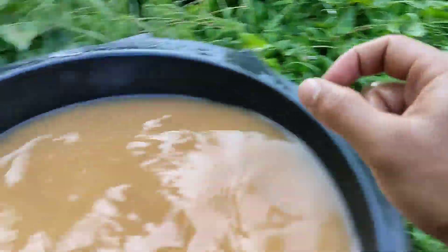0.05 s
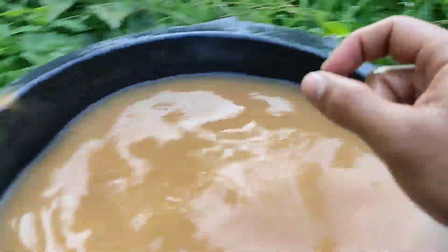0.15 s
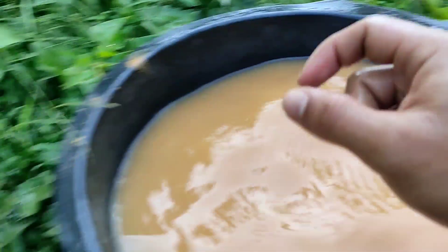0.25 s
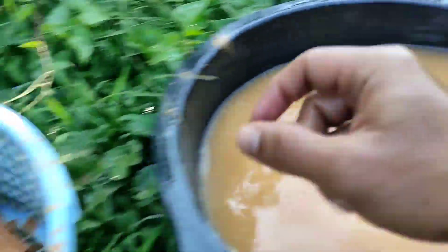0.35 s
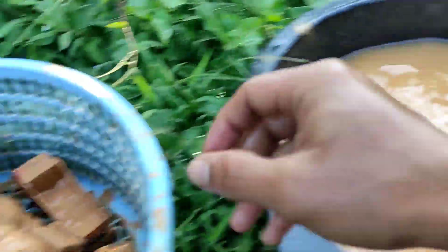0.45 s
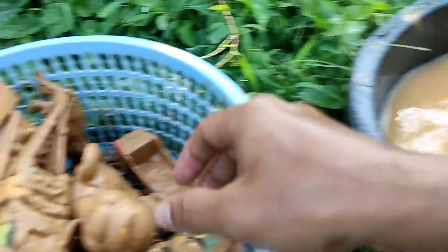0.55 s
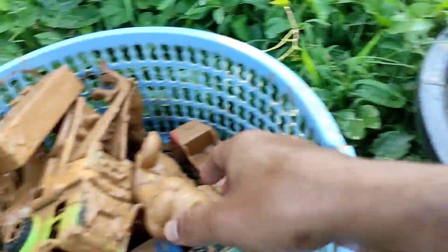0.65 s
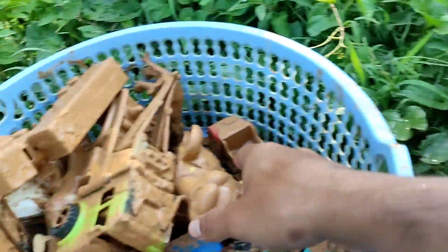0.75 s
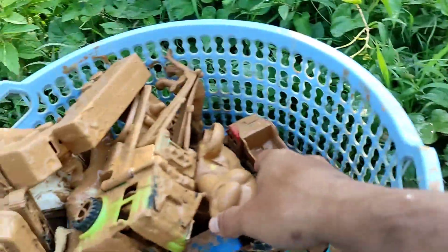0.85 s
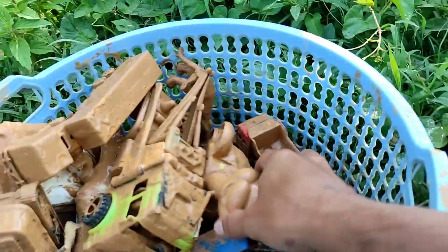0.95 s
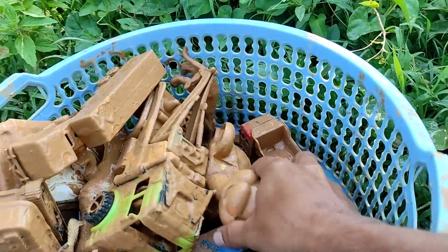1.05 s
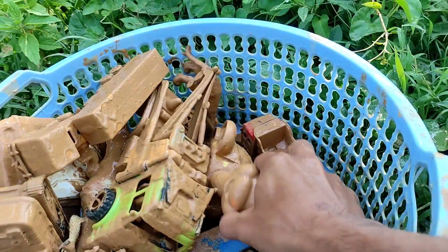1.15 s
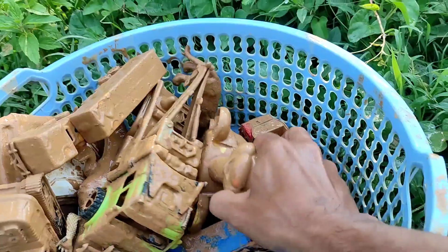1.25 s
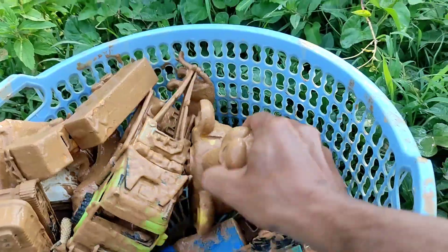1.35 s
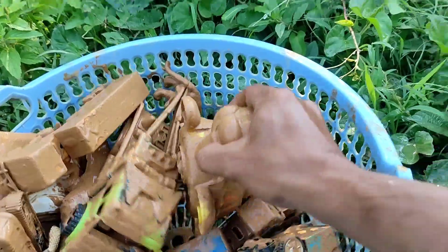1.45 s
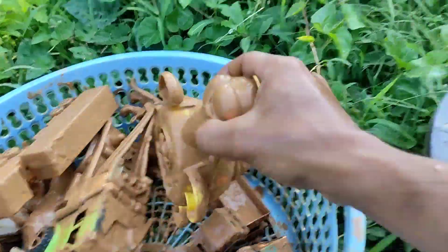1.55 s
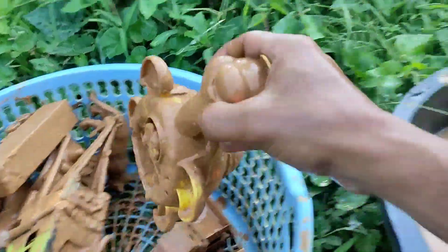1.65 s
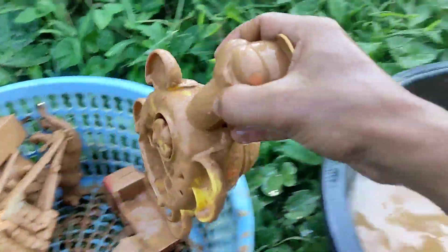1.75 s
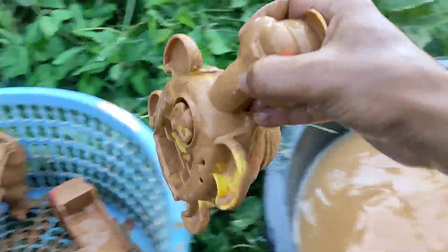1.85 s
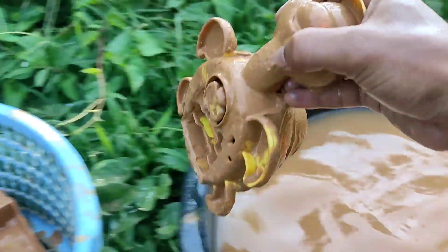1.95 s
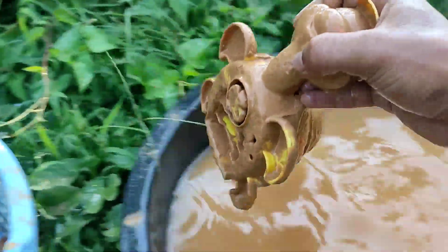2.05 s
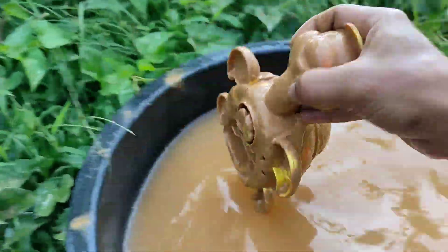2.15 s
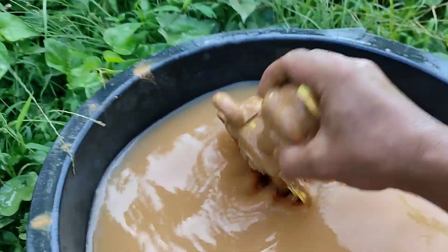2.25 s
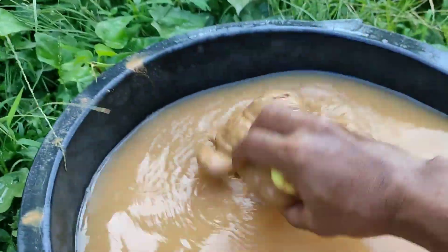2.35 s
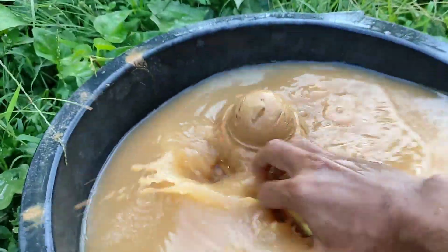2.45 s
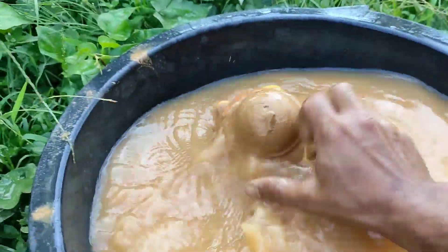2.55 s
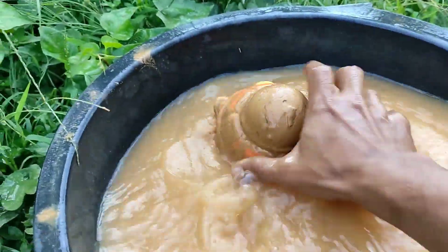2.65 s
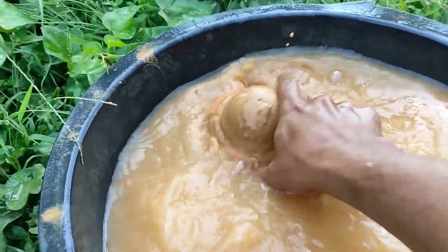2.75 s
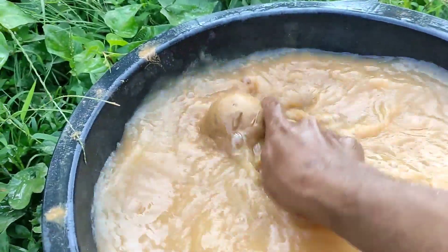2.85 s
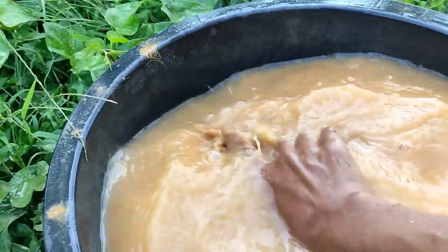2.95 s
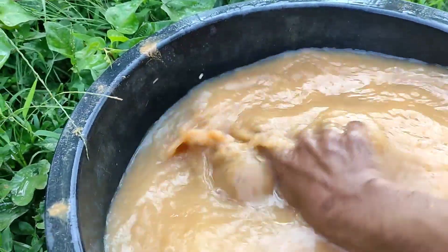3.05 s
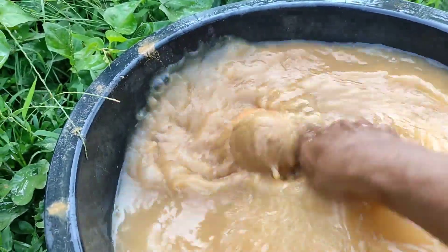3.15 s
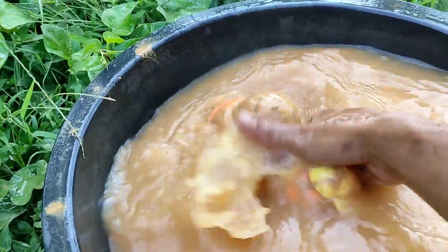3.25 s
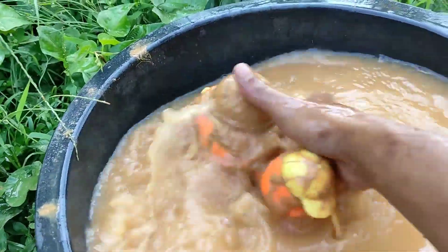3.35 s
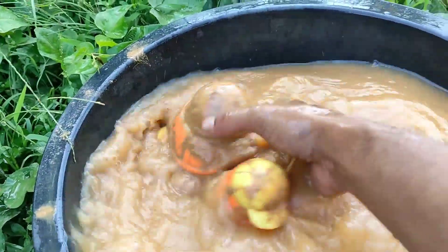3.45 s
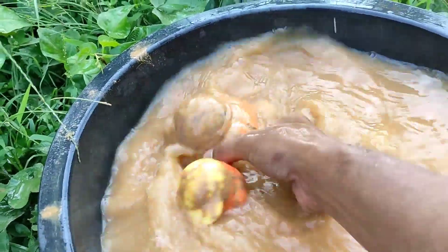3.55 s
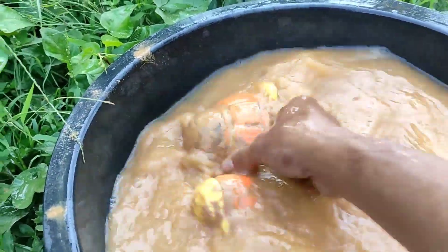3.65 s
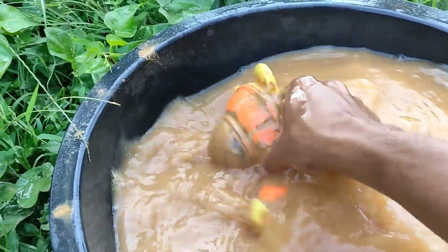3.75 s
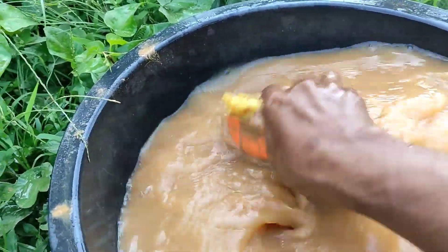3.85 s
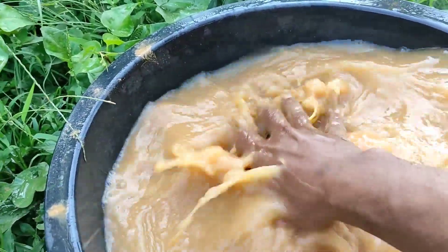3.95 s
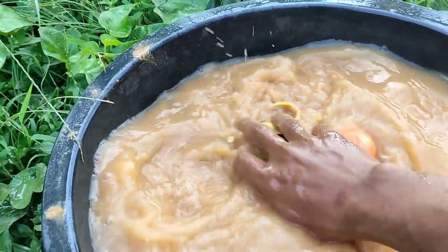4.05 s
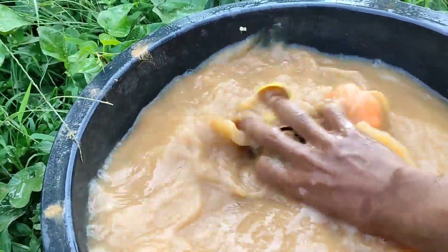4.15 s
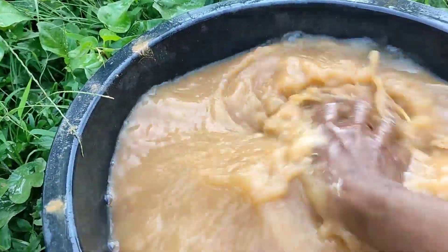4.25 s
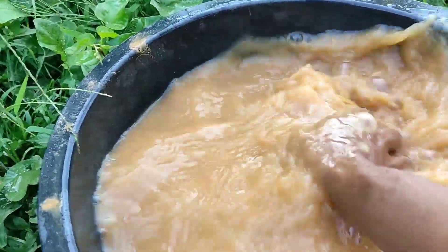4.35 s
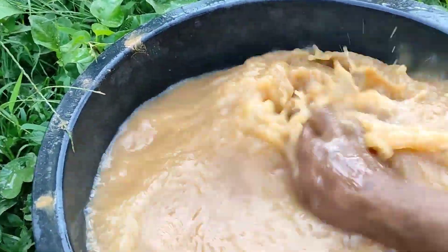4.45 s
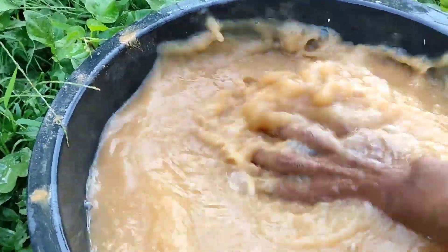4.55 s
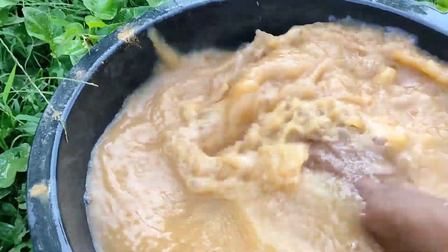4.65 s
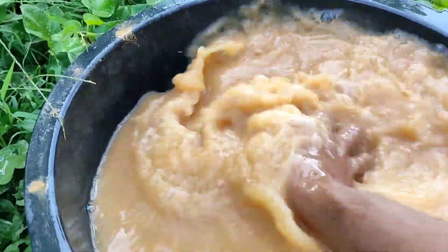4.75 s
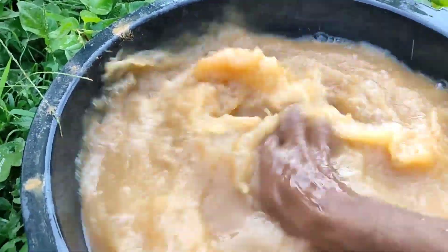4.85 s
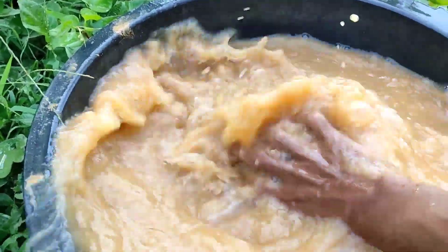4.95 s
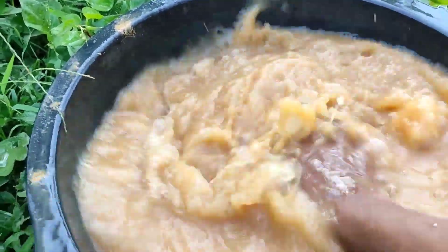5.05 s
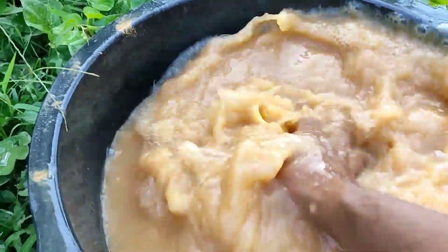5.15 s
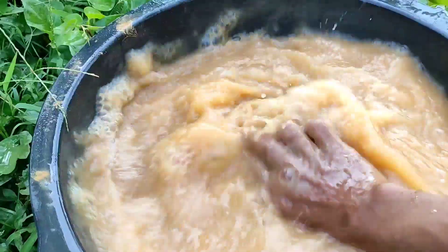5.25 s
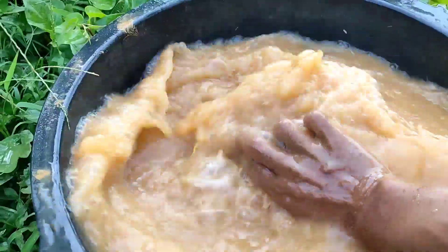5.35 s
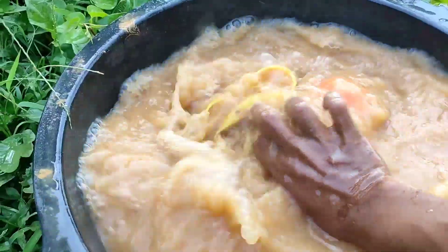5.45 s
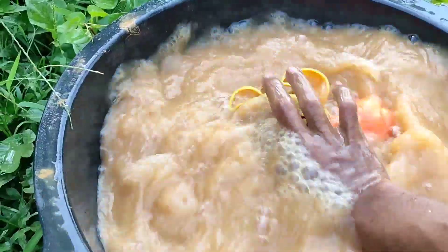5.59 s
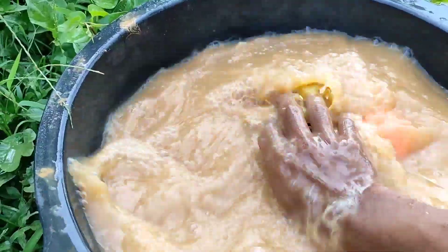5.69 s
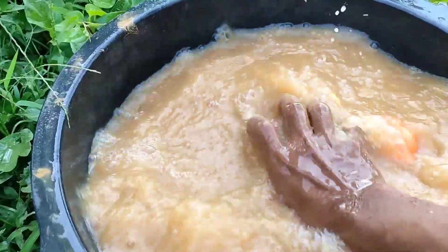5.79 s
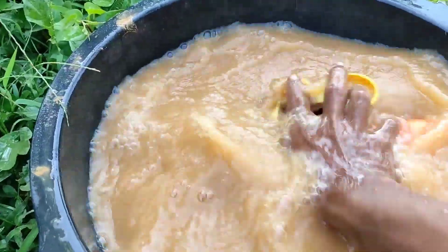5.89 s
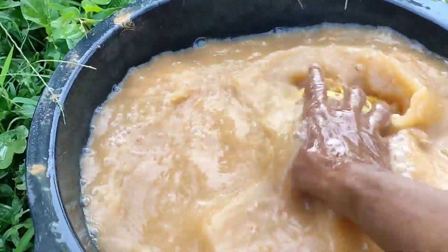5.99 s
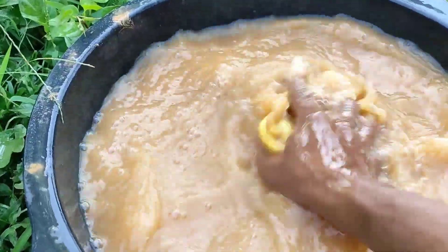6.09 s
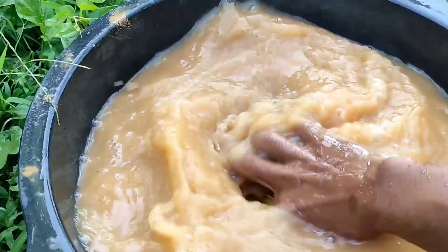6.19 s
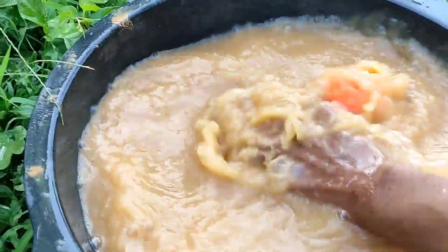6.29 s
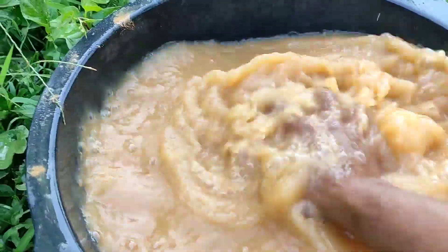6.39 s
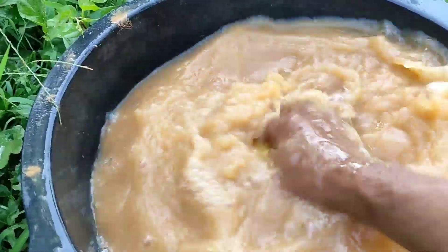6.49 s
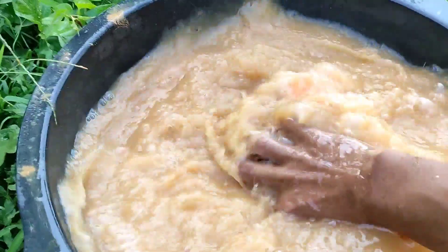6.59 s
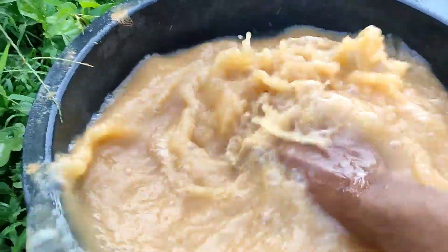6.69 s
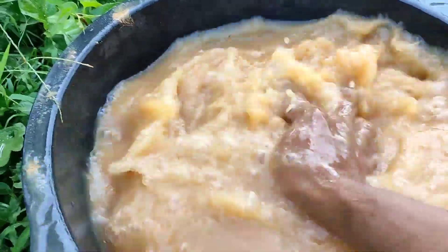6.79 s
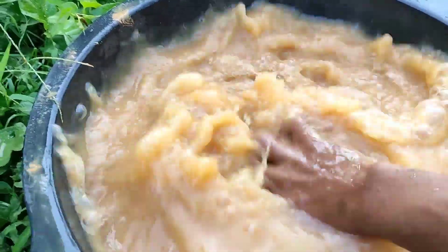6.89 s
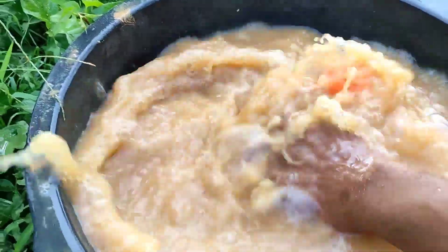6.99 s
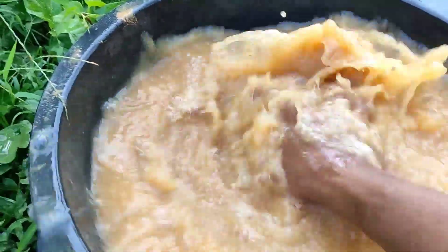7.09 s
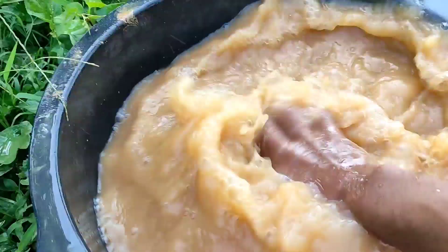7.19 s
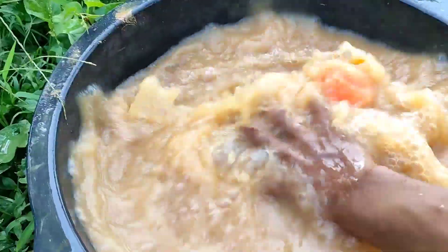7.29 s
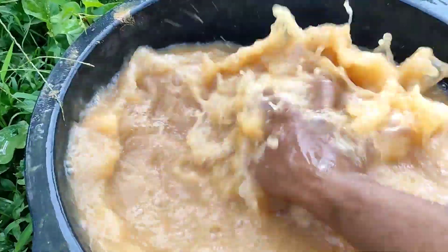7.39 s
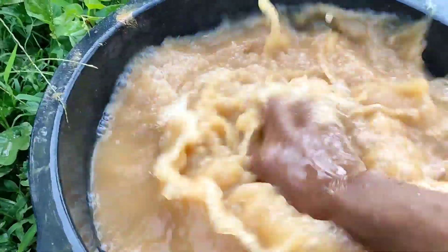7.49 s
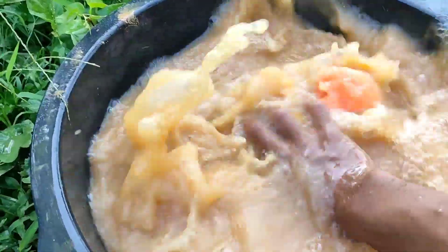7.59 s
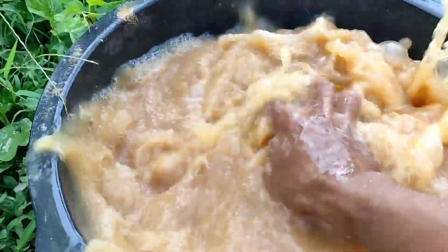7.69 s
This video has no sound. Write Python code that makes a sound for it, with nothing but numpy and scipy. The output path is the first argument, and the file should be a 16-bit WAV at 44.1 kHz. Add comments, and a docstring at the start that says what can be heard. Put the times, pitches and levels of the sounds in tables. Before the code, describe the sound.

Close and dry in the open air: a small drip, near quiet, then a short scuffing drag of wet hollow plastic. A loud plunge into a water tub follows, with scattered bloops and spattering drops. The scrubbing starts gently, pauses slightly, then grows into rapid swishes, gurgles, throaty glugs and fizzing spray that are loudest at the end. Faint insects and distant low rumble lie beneath.

```python
"""Air pockets trapped in a plastic tub of muddy water ring as gliding, decaying sines while a hand scrubs a toy.
First the hand leaves the tub and drags the toy out of a basket of toys: noise slips excite hollow resonances.
Thrown drops splat as short noise bursts; the churned water gurgles and fizzes as swarms of small bubbles
on rushing noise. Outdoors, far rumble, leaf hiss and insects are shaped noise. Two close microphone ports hear it."""
import sys
import numpy as np
from scipy import signal
from scipy.fft import rfft, irfft, next_fast_len
from scipy.io import wavfile
from scipy.ndimage import uniform_filter1d, map_coordinates

SR = 44100
rng = np.random.default_rng(int(sys.argv[2]) if len(sys.argv) > 2 else 0)


def int16_out(signal):
    """Quantize to a 16-bit WAV file."""
    q = np.round(np.clip(np.atleast_2d(signal).T, -1, 1) * 32767)
    wavfile.write(sys.argv[1], SR, q.astype(np.int16))


def field_ratio(decibels):
    """Amplitude ratio for a level in dB (20 dB per decade); scalars and array-likes work."""
    return 10 ** (np.asarray(decibels, dtype=float) / 20)


N = 340893  # samples


def unit(x):
    """Normalization: a signal scaled to rms 1."""
    return x / np.sqrt(np.mean(x ** 2) + 1e-20)


def along(points, hz):
    """Spectral interpolation: (Hz, value) points joined on a logarithmic frequency axis."""
    f, v = np.transpose(points)
    return np.interp(np.log(hz + 1), np.log(f + 1), v)


def curve(rows):
    """Level contour: dB per sample along (s, dB) rows, silent outside them."""
    s, db = np.transpose(rows)
    return np.interp(np.arange(N) / SR, s, db, -200, -200)


def wobble(rate):
    """Band-limited fluctuation: a smooth random curve with rate knots a second."""
    coarse = np.arange(0, N + 16, 16)
    knots = rng.standard_normal(int(N * rate / SR) + 4)
    return np.interp(np.arange(N), coarse, map_coordinates(knots, [coarse * rate / SR]))


def filtered(x, response):
    """Linear filtering: the spectrum times a complex response of frequency."""
    m = next_fast_len(N + 8192)
    return irfft(rfft(x, m) * response(np.fft.rfftfreq(m, 1 / SR)), m)[..., :N]


def resonant(modes):
    """Modal superposition: causal response of (Hz, width Hz, dB) resonances with alternating sign."""
    def response(f):
        total = 0
        for k, (centre, width, db) in enumerate(modes):
            damping = 1j * f * width
            total = total + (-1) ** k * field_ratio(db) * damping / (centre * centre - f * f + damping)
        return total
    return response


def hiss(response, alike):
    """Partial coherence: stereo noise of rms 1 with a colour and a left-right likeness per frequency."""
    m = next_fast_len(N)
    hz = np.fft.rfftfreq(m, 1 / SR)
    turn = np.arccos(np.clip(along(alike, hz), -1, 1)) / 2
    a, b = rng.standard_normal((2, 2, len(hz)))
    mid, side = irfft((a + 1j * b) * response(hz) * [np.cos(turn), np.sin(turn)], m)[:, :N]
    return unit(np.array([mid + side, mid - side]))


def patchy(x, depth_db):
    """Time-frequency modulation: random gain patches about a kilohertz wide and some 15 ms long, rms 1."""
    z = signal.stft(x, nperseg=256)[2]
    across_hz = uniform_filter1d(rng.standard_normal(z.shape[1:]), size=8, axis=0)
    field = uniform_filter1d(across_hz, size=4, axis=1)
    return unit(signal.istft(z * field_ratio(depth_db * unit(field)), nperseg=256)[1][:, :N])


def crests(s, db, fall, rise):
    """Energy summation: power of swells that climb to db at s and sink 10 dB per fall time."""
    t = np.arange(0, N, 64)[:, None] / SR - s
    power = np.sum(field_ratio(db - 10 * np.abs(t) / np.where(t < 0, rise * fall, fall)) ** 2, axis=1)
    return np.interp(np.arange(N), np.arange(0, N, 64), power)


def bubbles(s, db, hz, glide, swell, decay, lag, pan_db, size):
    """Damped oscillators: gliding sines swell to a peak at s, then lose 10 dB per decay time."""
    step = np.arange(size) - size // 3
    t = step / SR
    bend = np.clip(glide * t, -1, 0.33)  # octaves from the pitch at the peak
    phase = 2 * np.pi * np.cumsum(hz * 2 ** bend, axis=1) / SR
    envelope = np.where(t < 0, np.clip(1 + t / swell, 0, 1), field_ratio(-10 * np.abs(t) / decay))
    wave = envelope * np.sin(phase)
    out = []
    for side in (1, -1):  # the left port hears each bubble lag seconds late
        at = np.clip(np.round((s + side * lag[:, None] / 2) * SR).astype(int) + step, 0, N)
        panned = field_ratio(db + side * pan_db / 2) * wave
        out.append(np.bincount(at.ravel(), panned.ravel(), N + 1)[:N])
    return np.array(out)


def swarm(count, hz, octaves, cycles, scatter_db, lag_ms, size):
    """Stochastic superposition: small bubbles all through, of log-normal pitch and uneven level, rms 1."""
    when = rng.random((count, 2))
    z = rng.standard_normal((count, 5))
    pitch = np.clip(hz * 2 ** (octaves * z[:, :1]), 290, 15500)
    life = cycles * 2 ** (.5 * z[:, 1:2]) / pitch
    db = np.minimum(-scatter_db * np.log(when[:, 1:]), 9)  # a few loud among many soft
    glide = (0.31 + 0.19 * z[:, 2:3]) / life / 2  # a bubble rising to the surface sharpens
    lag, pan_db = lag_ms / 1000 * z[:, 3], 1.6 * z[:, 4:]
    return unit(bubbles(when[:, :1] * N / SR, db, pitch, glide, 0.38 * life, life, lag, pan_db, size))


# Spectrum of far rumble and leaf hiss. Each row: frequency in Hz, relative spectral level in dB.
AIR_COLOUR = [(15, -65), (25, -22), (120, -3), (326, -17), (560, -21), (624, -22), (754, -22), (2000, -30),
              (3820, -32), (7310, -37.5), (10700, -32), (16000, -45)]
# Coherence of the open air. Each row: frequency in Hz, left-right likeness (1 is alike).
AIR_LIKENESS = [(60, 0.91), (130, 0.95), (290, 0.52), (640, 0), (1400, 0)]
# Insect bands. Each row: centre in Hz, width in Hz, level in dB, pulses per second, left-right difference in dB.
INSECT_BANDS = [(9620, 1000, -63.5, 110, 11.5), (11770, 800, -66, 120, -12)]


def garden():
    """Amplitude-modulated noise: insects pulse in narrow treble bands over far rumble and leaf hiss."""
    air = hiss(lambda hz: field_ratio(along(AIR_COLOUR, hz)) * (1 + 40 / (hz + 20)), AIR_LIKENESS)
    out = field_ratio(-42.5 + 0.52 * wobble(4.5)) * air
    growth = np.clip(np.arange(N) / SR - 1.6, 0, 1)  # the low rumble grows over the tub
    rumble = hiss(lambda f: resonant([(110, 110, 0)])(f) ** 2, AIR_LIKENESS)
    out += field_ratio(-48.5 + 5.1 * wobble(5)) * growth * rumble
    for hz, width, db, rate, pan_db in INSECT_BANDS:
        pulses = 1 + .7 * np.sin(2 * np.pi * np.cumsum(rate * (1 + 0.018 * wobble(5.1))) / SR)
        band = hiss(lambda f: resonant([(hz, width, 0)])(f) ** 2, AIR_LIKENESS)
        out += field_ratio(db + 1.7 * wobble(3.1) + np.array([[pan_db], [-pan_db]]) / 2) * pulses * band
    return out


# Coherence of the near sounds. Each row: frequency in Hz, left-right likeness (1 is alike).
WATER_LIKENESS = [(290, 1), (640, 0.84), (1400, 0.43), (3100, 0.49), (6000, 0.021)]
# Colour of the spray at the ports. Each row: frequency in Hz, relative spectral level in dB.
PORT_COLOUR = [(1760, 6), (3000, 5), (4630, -4.5), (6620, -9), (7150, -15), (8880, 0), (12000, -6.5),
               (14900, -10.5), (16000, -33)]
# Effort of the drag from the pile. Each row: time in seconds, scrape level in dB.
SCRAPE_LEVEL = [(1.25, -74), (1.285, -39), (1.351, -43), (1.44, -35), (1.46, -30), (1.47, -20.5),
                (1.485, -30), (1.525, -27.5), (1.578, -32.5), (1.672, -41), (1.706, -80)]
# Modes of the hollow plastic toy. Each row: frequency in Hz, width in Hz, gain in dB.
TOY_MODES = [(330, 180, -6), (1120, 720, 1), (2000, 1060, -0.5), (4500, 5600, -15.5)]
# The pitch of the gap under the toy dips, rises, then sinks as it lifts. Each row: time in seconds, pitch in Hz.
GAP_PITCH = [(1.3, 1900), (1.39, 1500), (1.47, 2000), (1.525, 1097), (1.701, 950)]
# The pile settles. Each row: time of crest in seconds, level in dB, seconds to lose 10 dB.
PILE_SHIFTS = [(.52, -47, .03), (.82, -47, .05), (1.391, -39, 0.04), (1.56, -33, 0.06)]


def drag():
    """Stick-slip excitation: uneven slips of wet plastic drive hollow bodies and a gap of moving pitch."""
    scrape_db = curve(SCRAPE_LEVEL)
    rattle = field_ratio(-42 + 0.28 * (scrape_db + 35))  # -42 dB when the scrape is at -35 dB
    settling = crests(*np.transpose(PILE_SHIFTS), rise=0.79)
    knock = np.sqrt(rattle ** 2 * (scrape_db > -199) + settling)
    slips = field_ratio(2.0 * wobble(200) + 1.06 * wobble(40.16))
    body = hiss(lambda hz: resonant(TOY_MODES)(hz) / (1 + (600 / (hz + 1)) ** 4), WATER_LIKENESS)
    turn = 2 * np.pi * np.cumsum(np.interp(np.arange(N) / SR, *np.transpose(GAP_PITCH))) / SR
    gap = unit(wobble(500) * np.cos(turn) + wobble(500) * np.sin(turn))
    film = hiss(lambda hz: field_ratio(along(PORT_COLOUR, hz)) / (1 + (3000 / (hz + 1)) ** 4), WATER_LIKENESS)
    rubbing = patchy(slips * (body + 0.66 * gap + 0.5 * film), depth_db=3.0)
    pile = hiss(resonant([(260, 93, 0.9), (430, 224, -2.3)]), WATER_LIKENESS)
    knocking = unit(field_ratio(4.6 * wobble(50.02)) * pile)
    return (field_ratio(scrape_db) * rubbing + knock * knocking) * field_ratio([[1.5], [-1.5]])  # left-right dB


# How hard the hand works the water. Each row: time in seconds, gurgle drive in dB.
HAND_EFFORT = [(1.95, -66), (2.2, -53), (2.39, -60), (2.62, -46), (3.0, -52), (3.17, -49), (3.3, -38),
               (3.68, -53), (3.85, -43.5), (4.25, -40.5), (4.5, -31.5), (4.9, -37), (5.25, -30.5),
               (5.72, -37.5), (6.03, -49.5), (6.3, -29), (6.9, -26.5), (7.2, -23.5), (7.74, -22)]
# Waves thrown up by the hand. Each row: time of crest in seconds, gurgle drive in dB,
# spray over gurgle in dB, seconds to lose 10 dB.
HAND_WAVES = [(.004, -38, -15, .04), (.06, -46, 4, .03), (.092, -35, -1, 0.018), (.148, -42, -10, .02),
              (2.421, -22, -10, 0.0178), (2.467, -22, -10, .04), (2.52, -29, -6, .025),
              (2.58, -27, -7, .035), (2.735, -46, 9, .07), (2.76, -26, -12, .04), (2.875, -32.5, -20, 0.02),
              (2.93, -27, -3, .05), (3.029, -27.5, -9, 0.043), (3.107, -29, -4, .025), (3.21, -45, 4, 0.05),
              (3.375, -44, 11, .05), (3.432, -41, -12, 0.1), (3.5, -46, 6, .05), (3.55, -44, 6, .05),
              (3.737, -30, -9.5, .02), (3.63, -44, 8, 0.05), (3.985, -42, 9, .05), (4.051, -22, -8, .04),
              (4.126, -21.5, -4, 0.0435), (4.332, -28, -1, 0.0351), (4.464, -26.5, -16, 0.08),
              (4.54, -30, 3.5, 0.13), (4.679, -19.5, -9.5, 0.0737), (4.79, -25.5, -5, 0.0864),
              (4.96, -21, -6, .07), (5.08, -20.5, -4, .12), (5.27, -26, -6, .04), (5.335, -20.5, -4, .08),
              (5.443, -14.5, -25, 0.01), (5.553, -29.5, -4, 0.11), (5.773, -28.5, -2.5, 0),
              (5.945, -37, 1.5, 0.1), (6.088, -39.5, 2.5, 0.1), (6.254, -29.5, -2, 0.09),
              (6.363, -20, -6, 0.0557), (6.46, -27, -4, .06), (6.56, -30, -14, .04), (6.62, -31.5, 3, .11),
              (6.745, -24.5, -9, .09), (6.82, -28.5, 4, 0.12), (6.9, -23, -7, .08),
              (6.99, -18.5, -7, 0.125), (7.307, -24.5, -5.5, 0.09), (7.436, -23.5, -2, 0.13),
              (7.59, -27, 2, .1)]


def stirring():
    """Energy addition: the drives of gurgle and spray sum the steady effort and the single waves."""
    effort_db = curve(HAND_EFFORT)
    s, db, spray_db, fall = np.transpose(HAND_WAVES)
    rise = .6  # a wave builds in this share of the time it takes to fall
    steady_spray_db = -35.5 + 1.08 * (effort_db + 30)  # -35.5 dB when the effort is at -30 dB
    gurgle = field_ratio(effort_db) ** 2 + crests(s, db, fall, rise)
    spray = field_ratio(steady_spray_db) ** 2 + crests(s, db + spray_db, fall, rise)
    return np.sqrt([gurgle, spray])


# Modes of the air over the water. Each row: frequency in Hz, width in Hz, gain in dB.
TUB_MODES = [(430, 300, 4.5), (870, 122, 5.5), (1350, 317, 4.5)]


def churn():
    """Bubble-cloud radiation: clouds of several sizes and droplet ticks on rushing noise, with wall thuds."""
    gurgle, spray = stirring()
    lump = wobble(70)  # shared unevenness of all three bands
    rush = hiss(resonant(TUB_MODES), WATER_LIKENESS)

    low = swarm(count=1900, hz=680, octaves=0.52, cycles=2.9, scatter_db=4.5, lag_ms=0.098, size=700)
    low = low + 0.4 * rush
    mid = swarm(count=2200, hz=1500, octaves=0.36, cycles=4.6, scatter_db=6.0, lag_ms=0.14, size=500)
    mid = mid + 0.3 * rush
    mid = filtered(mid, lambda hz: .5 + .5 / (1 + (hz / 1850) ** 16))  # steps down above 1850 Hz

    fine = swarm(count=6000, hz=6980, octaves=0.71, cycles=3.6, scatter_db=5, lag_ms=.15, size=90)
    drops = filtered(fine, lambda hz: field_ratio(0.37 * along(PORT_COLOUR, np.maximum(hz, 3500))))
    plinks = swarm(count=1200, hz=2990, octaves=0.498, cycles=7.2, scatter_db=6.5, lag_ms=0.11, size=330)
    fizz = hiss(lambda hz: field_ratio(along(PORT_COLOUR, hz)) / (1 + (2200 / (hz + 1)) ** 2), WATER_LIKENESS)
    fizz = patchy(fizz, depth_db=4.5) * field_ratio(2.3 * wobble(200))
    high = 0.85 * unit(drops) + .68 * plinks + fizz
    thud = hiss(lambda hz: resonant([(140, 160, 0)])(hz) ** 2, WATER_LIKENESS)

    low = unit(low * field_ratio(2.1 * lump + 4 * wobble(30)))
    mid = unit(mid * field_ratio(1.94 * lump + 1.3 * wobble(45)))
    high = unit(high * field_ratio(1.77 * lump + 1.6 * wobble(90)))
    thud = unit(thud * field_ratio(3.6 * wobble(20)))  # waves against the tub wall
    out = gurgle * low * field_ratio(-3.6)
    out += np.sqrt(gurgle * spray) * mid * field_ratio(-1.5)
    out += spray * high * field_ratio(-0.5)
    out += gurgle * thud * field_ratio(-24.5)
    return out


# Thrown water landing. Each row: time in seconds, level in dB before a common 5 dB cut, centre in Hz.
LANDINGS = [(0.0737, -15.5, 4000), (0.0932, -32, 8830), (0.138, -31, 2000), (0.84, -36, 2500),
            (2.3266, -14.5, 3900), (2.422, -16, 2900), (2.453, -12.5, 3980), (2.473, -8, 4600),
            (2.4765, -12, 12000), (2.508, -4.5, 9110), (2.599, -11, 3500), (2.6084, -14, 9020),
            (2.6788, -15, 3600), (2.7232, -25, 9220), (2.8574, -27, 9440), (2.926, -15, 9420),
            (2.9324, -16.5, 3960), (2.9648, -16.5, 3600), (3.019, -21, 4740), (3.0265, -19, 10100),
            (3.0979, -23, 3780), (3.1222, -19.5, 3200), (3.1918, -21, 8200), (3.2077, -12, 9990),
            (3.2164, -19, 4540), (3.3508, -24, 3050), (3.3812, -19, 3500), (3.3994, -16.5, 3520),
            (3.457, -24, 8850), (3.4855, -25, 9920), (3.538, -14, 9190), (3.6037, -25, 5600),
            (3.6306, -19.5, 3000), (3.6394, -15.5, 8870), (3.676, -25, 11000), (3.691, -23, 9000),
            (3.7249, -24, 8520), (3.9679, -10, 3610), (3.9958, -12, 8850), (4.026, -10, 3600),
            (4.0601, -10, 8340), (4.0838, -15, 8790), (4.1177, -10, 3870), (4.1374, -15.5, 9060),
            (4.1957, -22, 4730), (4.3969, -15.5, 6700), (4.5974, -17, 3660), (4.7125, -19, 5200),
            (4.7661, -20, 4180), (4.9473, -19, 3740), (5.005, -10, 8840), (5.173, -15.5, 8810),
            (5.252, -18, 4860), (5.3357, -10.5, 4660), (5.344, -12, 9330), (5.4085, -19, 6720),
            (5.5408, -15, 9540), (5.5585, -21, 5560), (5.656, -10.5, 4530), (5.7613, -17.5, 5400),
            (5.8194, -9, 11800), (5.9454, -23, 3950), (6.084, -14, 8740), (6.1789, -15, 9800),
            (6.2834, -21, 4780), (6.363, -11, 4520), (6.389, -12, 4810), (6.643, -18, 9600),
            (6.8225, -14, 8230), (6.993, -9.5, 9150), (7.0995, -18, 10500), (7.2646, -9.5, 11800),
            (7.4145, -15, 11300), (7.5145, -16, 8800), (7.5323, -11, 11800), (7.6882, -18, 11000)]
# Where the drops land. Each row: time in seconds, mean left-right difference in dB.
LANDING_SIDE = [(2.3, 3), (3.15, -2), (3.62, 6), (4.1, 0), (5.6, 2), (7.7, -2)]


def splats():
    """Impact noise: each landing is a brief burst, a droplet's ring over a duller slap, unlike at the ports."""
    out, size = np.zeros((2, N + 4096)), 2048
    u = np.arange(size) / SR / 0.00144  # time over the 1.44 ms rise
    envelope = (u * np.exp((1 - u * u) / 2)) ** 1.1
    f = np.fft.rfftfreq(size, 1 / SR) + 1
    colour = field_ratio(along(PORT_COLOUR, np.maximum(f, 3500)) * 0.78)
    for s, db, hz in LANDINGS:
        octaves = np.log2(f / hz)
        ring = 1.3 * np.exp(-(octaves / 0.16) ** 2) + .8 * np.exp(-(octaves / 0.95) ** 2)
        slap = 0.9 * f ** 2 / (f ** 2 + (0.2 * hz) ** 2) / (1 + (f / hz) ** 0.4)
        noise = rfft(rng.standard_normal((2, size)))
        burst = unit(irfft(noise * (ring + slap) * colour, size))
        pan_db = np.interp(s, *np.transpose(LANDING_SIDE)) + 1.5 * rng.standard_normal()
        at = round((s - 0.00032) * SR)
        out[:, at:at + size] += field_ratio(db - 5 + np.array([[pan_db], [-pan_db]]) / 2) * burst * envelope
    return out[:, :N]


# Short ringing pops of air pockets, with a few low thumps and high chirps. Each row: time of peak in seconds,
# peak level in dB, pitch in Hz, glide in octaves per second, decay in ms per 10 dB (played as at least 0.5).
AIR_POPS = [(.012, -29, 172, 0, 25), (.075, -19.5, 1207, -1.5, 4), (.117, -34, 1200, 0, 3),
            (.145, -24.5, 190, 0, 26), (.533, -34, 520, 20, 3), (2.022, -33, 8000, 0, 3),
            (2.365, -26, 397, 2, 11), (2.378, -21.5, 2120, 0, .67), (2.425, -1.5, 1400, 0, 1.3),
            (2.455, -18, 646, -10, 5), (2.511, -21, 2070, 0, 2), (2.454, -6.5, 1400, 1, 0.3),
            (2.465, -19, 250, 2, 28), (2.476, -9.5, 1350, 11, 1.5), (2.512, -17, 485, 29, 4.5),
            (2.531, -16, 835, -1, 4.5), (2.572, -18.5, 1350, 0.5, 3), (2.585, -23, 850, 0, 5),
            (2.587, -21, 1700, 20, 2), (2.682, -12, 2734, 10, 2.2), (2.711, -1.5, 838, 66, -0.1),
            (2.755, -20, 1700, 11, 2.6), (2.77, -1.5, 1152, 25.5, 3.8), (2.791, -27, 1680, 13, 4),
            (2.797, -12, 610, -25.5, 0), (2.85, -22.5, 480, 30, 14), (2.868, -26, 1550, 5, 6),
            (2.894, -24, 700, 10, 5), (2.914, -21, 850, 5, 3), (2.927, -15.5, 1650, -13, 2.1),
            (3.026, -25, 1900, 7, 3), (3.065, -24, 587, 11, 5.7), (3.092, -9.5, 980, 22, 2.1),
            (3.122, -26, 2240, 0, 3), (3.13, -23, 1700, 5, 3), (3.24, -29, 1400, 5, 8),
            (3.328, -27, 1400, 21, 4), (3.353, -25, 1603, 2.5, 2), (3.384, -25, 3300, 25.5, 6.6),
            (3.433, -31, 1380, 0, 4), (3.498, -18.5, 1670, 23, 3.5), (3.515, -31, 1464, 10, 4),
            (3.575, -16, 738, 16.5, 1), (3.585, -24, 1335, 14, 2.5), (3.671, -26, 430, 40, 1),
            (3.726, -14.5, 506, -1, 1), (3.738, -25, 520, 0, 2), (3.868, -27, 1350, 11, 6),
            (3.899, -22, 700, 5, 3), (3.951, -23, 950, 5, 5), (3.969, -8, 3630, -27.5, 1.3),
            (4.025, -22, 430, 37, 5), (4.029, -19, 1800, 0, 3), (4.048, -16, 540, 12, 20),
            (4.064, -18, 1330, -12, 5), (4.109, -21, 2370, 17, 3), (4.129, -12.5, 332.6, -27, 3),
            (4.179, -11, 470, 54.5, 2.1), (4.32, 3, 1450, 15.5, 1.5), (4.328, -2, 1266, -5, 1.5),
            (4.399, -20, 2200, 0, 2), (4.406, -24, 904, 30, 5), (4.43, -24, 1206, 40, 4),
            (4.482, -21, 431, 0, 4), (4.507, -21, 517, 5, 5), (4.594, -13, 1086, -13, 2.5),
            (4.633, -8, 1575, 29.5, 0.8), (4.649, -16.5, 394, 27, 16), (4.678, -4.5, 538, 7.5, 4.5),
            (4.69, -15.5, 740, 37, 10), (4.875, -8, 773, 43.5, 4.5), (4.92, -18, 3200, 5, 2.5),
            (4.921, -19, 861, 5, 9), (4.964, -18, 947, 0, 5), (4.98, -16, 431, 14, 9),
            (5.05, -16, 790, 13.5, 6), (5.086, -4, 512, 32.5, 2.1), (5.097, -16, 778, 16.5, 8),
            (5.268, -11.5, 392, 69, 1.3), (5.317, -2.5, 747, 29, 0.6), (5.319, -7, 287, 76, 3.5),
            (5.43, -6, 495, 27.5, 4), (5.431, -13.5, 760, 22.5, 21), (5.446, -14, 1220, 1.5, 14),
            (5.462, -9, 907, 7.5, 6), (5.546, -19, 1206, 56, 5), (5.658, -13.5, 1679, 0.5, 1.7),
            (5.68, -23, 172, 0, 12), (5.768, -23, 517, 0, 4), (5.756, -19.5, 1470, 36, 2),
            (5.791, -25, 1380, -15, 4.7), (5.946, -19.5, 1571, -13, 2.5), (6.046, -18, 1544, 54, 1.2),
            (6.08, -17, 1514, 30, 3), (6.12, -28, 1335, 0, 4), (6.145, -25, 700, 30, 3),
            (6.178, -24, 861, 58, 3), (6.239, -14.5, 456, -10.5, 9.5), (6.342, -8.5, 1014, -14.5, 3),
            (6.365, -4.5, 4500, -9, 2), (6.389, -16, 964, 15, 2.9), (6.397, -20, 418, -19, 9),
            (6.44, -15, 1005, -3.5, 4), (6.476, -17, 3010, 6, 5), (6.488, -13, 1075, 11.5, 3.5),
            (6.533, -21, 300, -20, 14), (6.556, -20, 1335, 5, 4), (6.684, -9.5, 1516, 8.5, 5.5),
            (6.728, -12.5, 697, 58, 8), (6.771, -19, 2900, -20, 2), (6.784, -15.5, 1383, 5, 8),
            (6.849, -16, 689, 10, 6), (6.9, -17.5, 340, 3, 35), (6.978, -10, 763, 28, 1.5),
            (7.001, -3.5, 430, 49, 3.5), (7.014, -14, 1750, 10, 5), (7.058, -16, 430, 10, 4),
            (7.08, -6.5, 404, 80, 1), (7.083, -9, 1600, -7.5, 3.2), (7.084, -9.5, 804, -4, 5),
            (7.133, -11, 970, 0, 9), (7.178, -11, 417, 2.5, 9.4), (7.232, -11, 340, 14.5, 3),
            (7.238, -17, 1720, 13, 2.5), (7.265, -6, 1227, -14.5, 6), (7.284, -14.5, 457, 0.5, 16),
            (7.417, -14.5, 430, 80, 18), (7.516, -9.5, 448, -14, 3), (7.545, -9.5, 343.6, 40, 12),
            (7.577, -15.5, 1305, 11, 11), (7.667, -3, 455, -15, 2.5)]
# Hollows in the water that close slowly, singing louder. Each row: time of peak in seconds, peak level in dB,
# pitch in Hz, glide in octaves per second, swell in ms.
CLOSING_HOLLOWS = [(2.417, -7, 1342, 52, 17), (2.673, -17.5, 1277, 13, 16), (2.72, -21, 893, 29, 7),
                   (2.93, -16.5, 972, -1.5, 7.5), (3.029, -18.5, 870, 7, 8.3),
                   (3.098, -17.5, 392, 14.5, 13.4), (4.168, -19, 800, 7, 34), (4.186, -19, 1100, 45, 16),
                   (4.665, -7.5, 835, 5, 8.2), (4.696, -14.5, 1430, -13.5, 11), (4.95, -17, 778, 12.5, 11),
                   (5.079, -21, 1304, 4, 13), (5.149, -15, 1265, 33, 6), (5.166, -13.5, 1010, 66, 8),
                   (5.357, -11, 430, -4, 18), (6.373, -18.5, 1017, -16.5, 17), (6.617, -15.5, 538, 4, 5.4),
                   (6.954, -18, 463, 14, 12), (7.118, -11, 836, 9, 9), (7.316, -16, 1306, 0, 11),
                   (7.436, -15.5, 695, 68, 14), (7.451, -15, 827, -2.5, 5)]


def pockets():
    """Volume resonance of trapped air: pops and closing hollows ring and glide, each with its own lag and pan."""
    s, db, hz, glide, decay = np.transpose(AIR_POPS)
    attack = 1.2 / 1000 + .6 / hz  # a fixed time in seconds plus part of a cycle
    pops = [s, db, hz, glide, attack, np.maximum(decay, .5) / 1000]
    s, db, hz, glide, swell = np.transpose(CLOSING_HOLLOWS)
    glugs = [s, db, hz, glide, swell / 1000, 0.49 * swell / 1000]  # loses 10 dB in 0.49 of the swell
    rows = np.hstack([pops, glugs])[:, :, None]
    z = rng.standard_normal((rows.shape[1], 2))
    flutter = field_ratio(1.8 * wobble(300) - 0.3)  # the moving surface shakes every tone
    return flutter * bubbles(*rows, lag=0.000091 * z[:, 0], pan_db=1.1 * z[:, 1:], size=4500)


def tub(x):
    """Early reverberation: the tub wall answers at once and briefly, alike at both ports only in the bass."""
    t = np.arange(2000) / SR
    noise = hiss(lambda hz: hz / (hz + 300) / (1 + (hz / 4000) ** 2), WATER_LIKENESS)[:, :len(t)]
    tail = noise * field_ratio(-60 * t / 0.023) * (t > .0008)  # 60 dB down in 23 ms
    return x + field_ratio(-16) * signal.fftconvolve(x, tail / np.linalg.norm(tail[0]), axes=1)[:, :N]


def scene():
    """Linear superposition: the garden, the toy and the water in the tub."""
    return garden() + drag() + churn() + tub(splats() + pockets())


def top_cut(x):
    """Nothing passes above the cut-off."""
    return signal.sosfilt(signal.butter(12, 16530, fs=SR, output="sos"), x)


# Treble mismatch of the two ports. Each row: frequency in Hz, left-right difference in dB.
PORT_TILT = [(3000, 0), (8000, 2.5), (15000, -4.5)]


def record(dry):
    """Transducer response: two ports with a bass cut, a treble limit and soft clipping at full scale."""
    def response(hz):
        band = (1j * hz / (1j * hz + 50)) ** 2 / (1 + (hz / 15700) ** 60)
        return band * field_ratio(np.outer([.5, -.5], along(PORT_TILT, hz)))
    ports = filtered(dry, response)
    mix = ports / (1 + np.abs(ports) ** 8) ** (1 / 8)
    return top_cut(mix)


dry = scene()
out = record(dry)
int16_out(out)
```